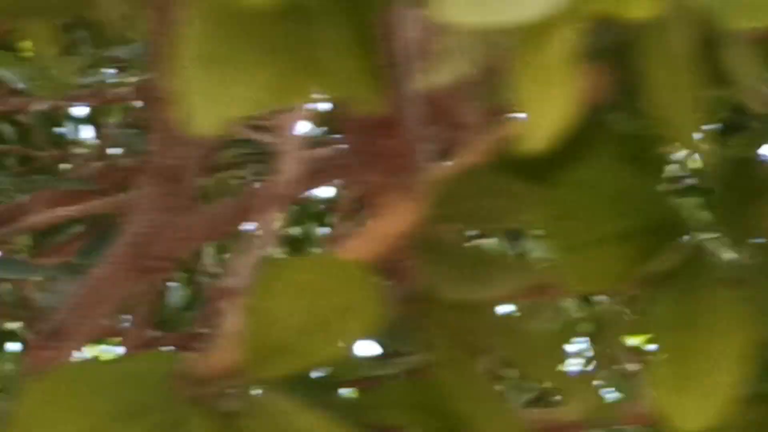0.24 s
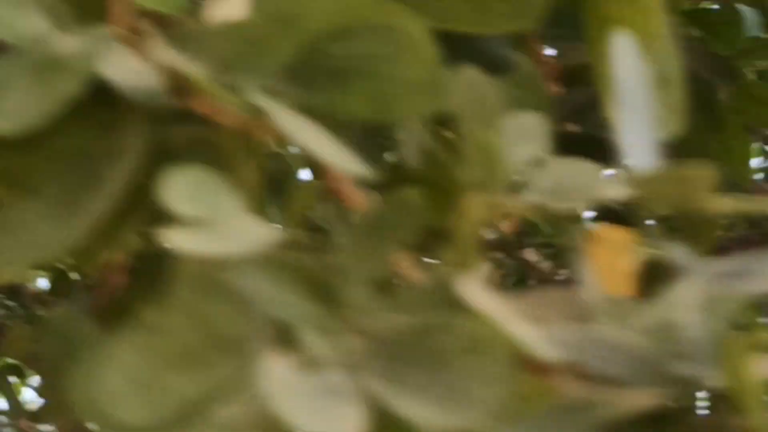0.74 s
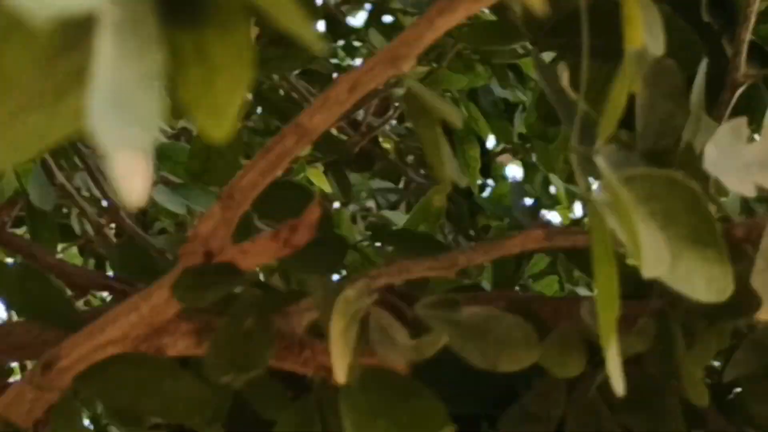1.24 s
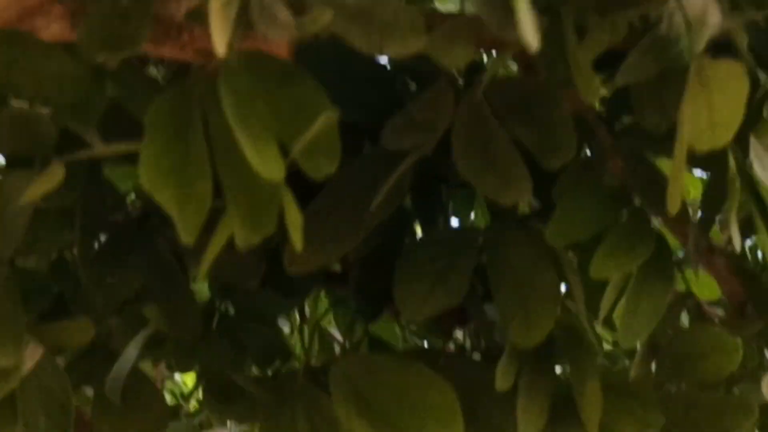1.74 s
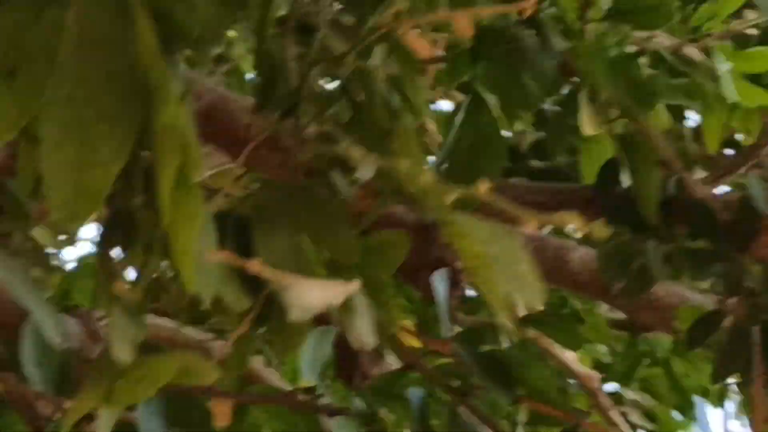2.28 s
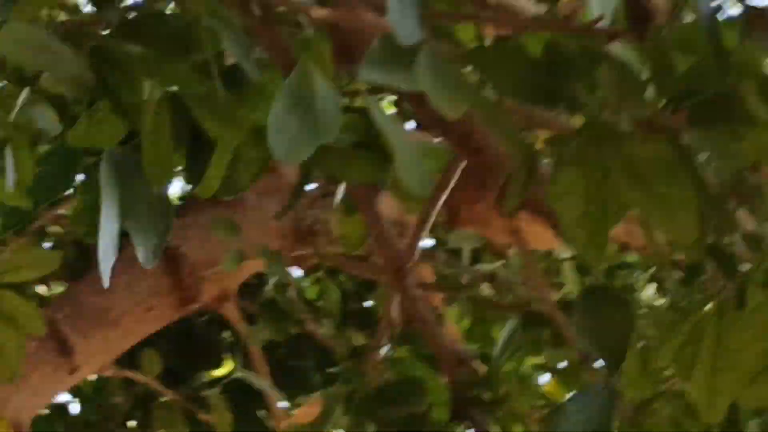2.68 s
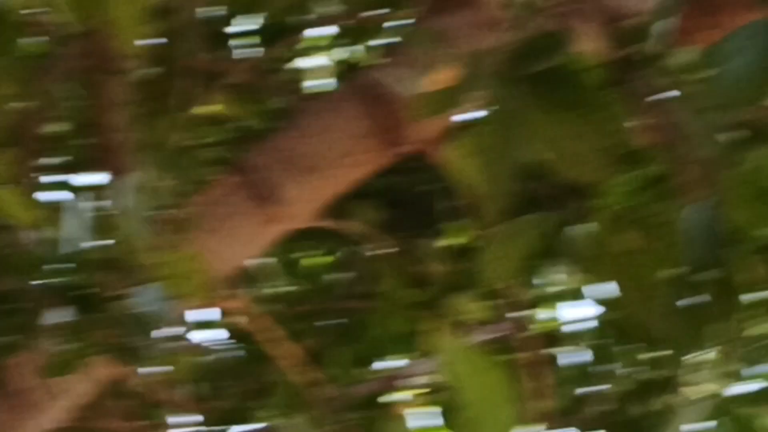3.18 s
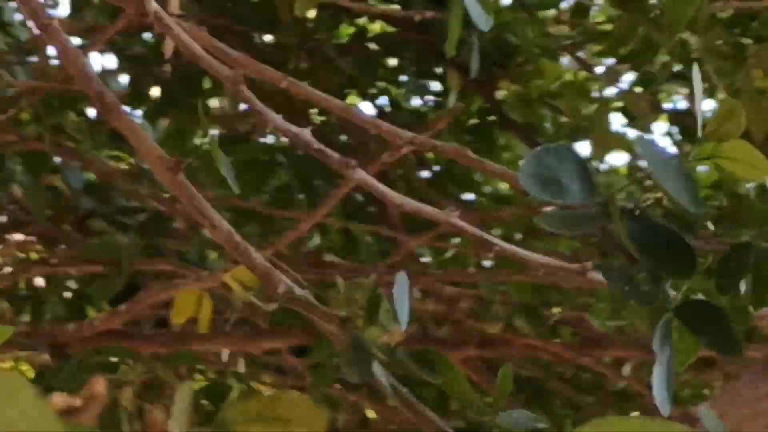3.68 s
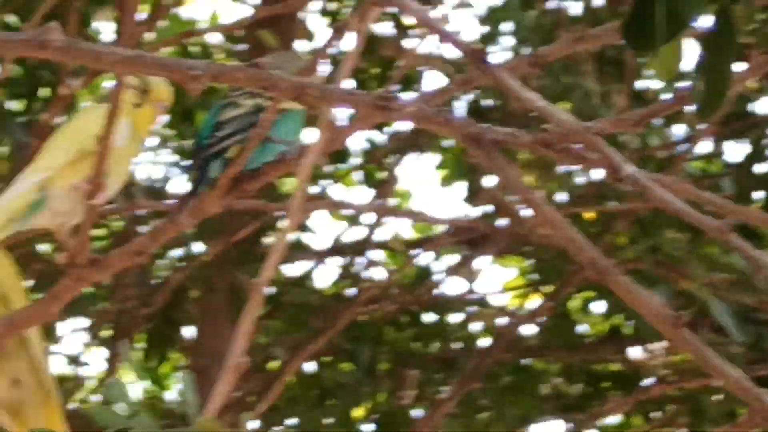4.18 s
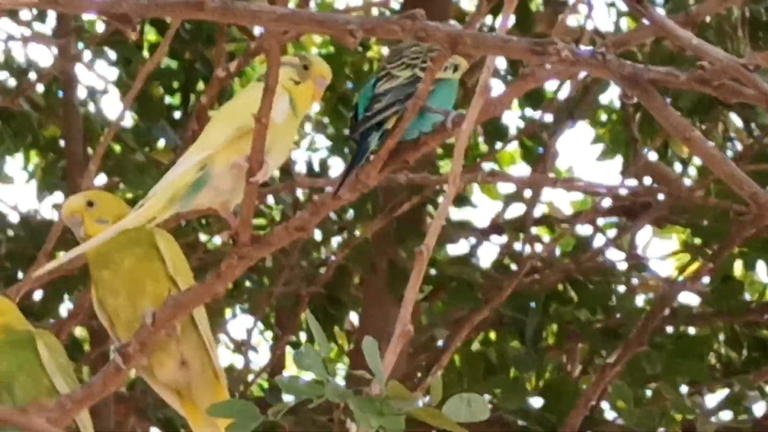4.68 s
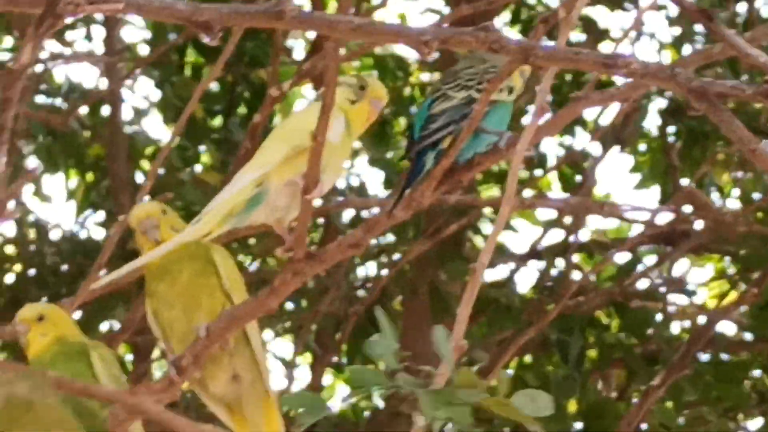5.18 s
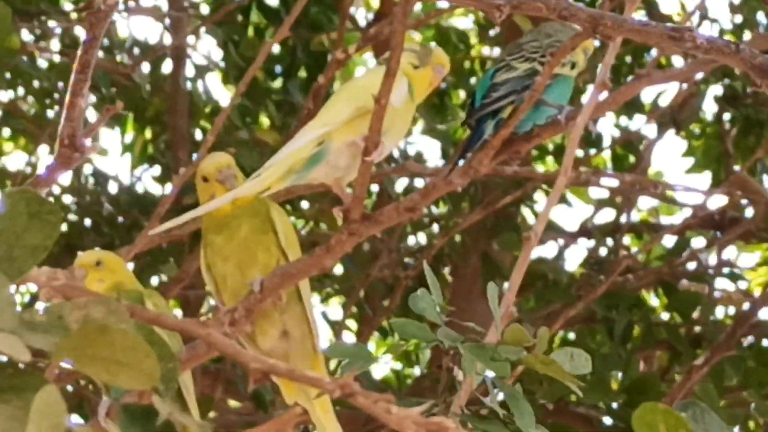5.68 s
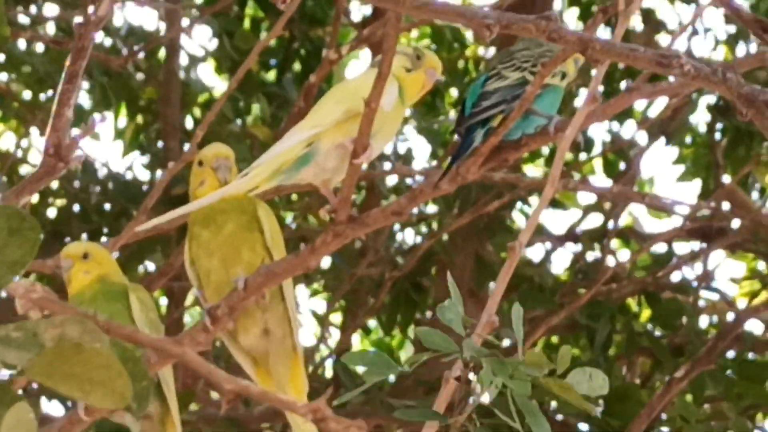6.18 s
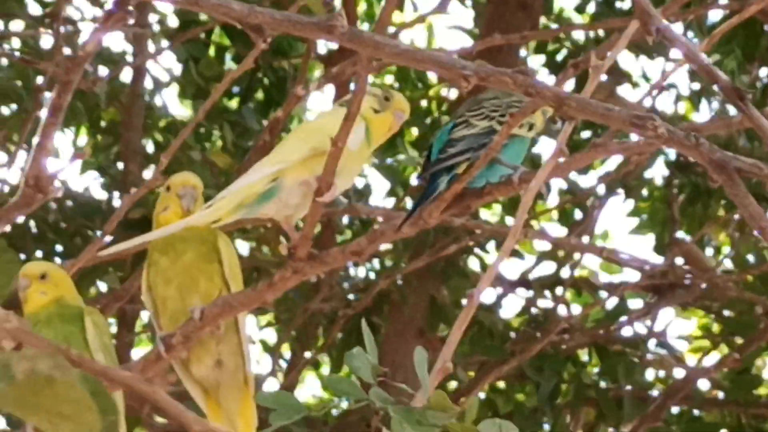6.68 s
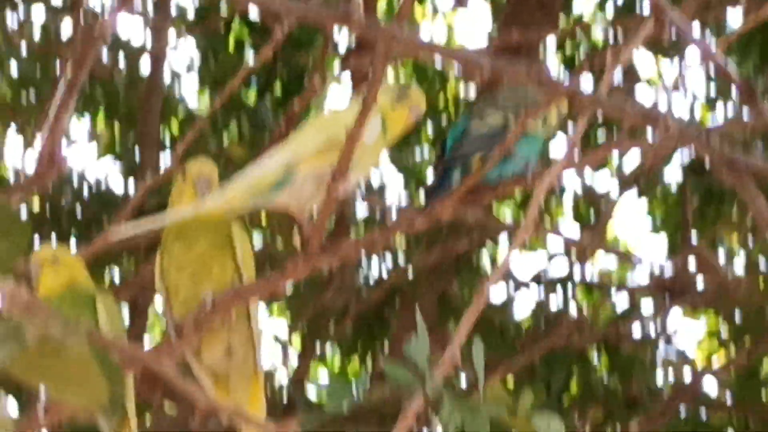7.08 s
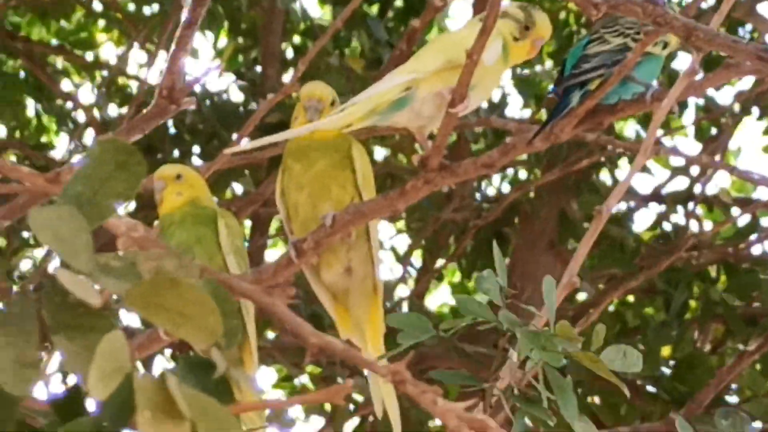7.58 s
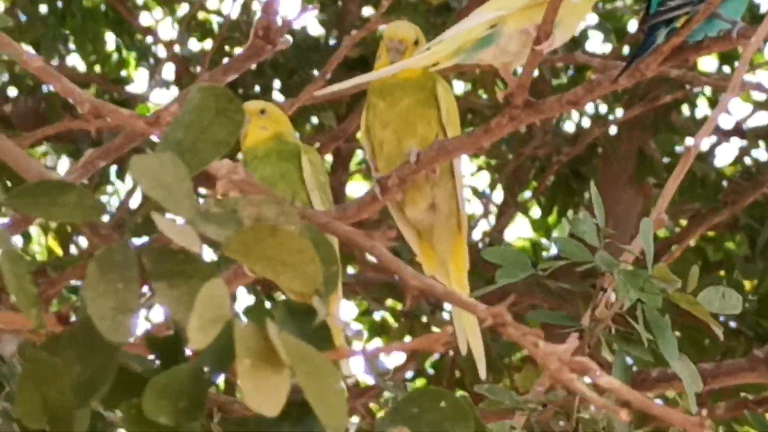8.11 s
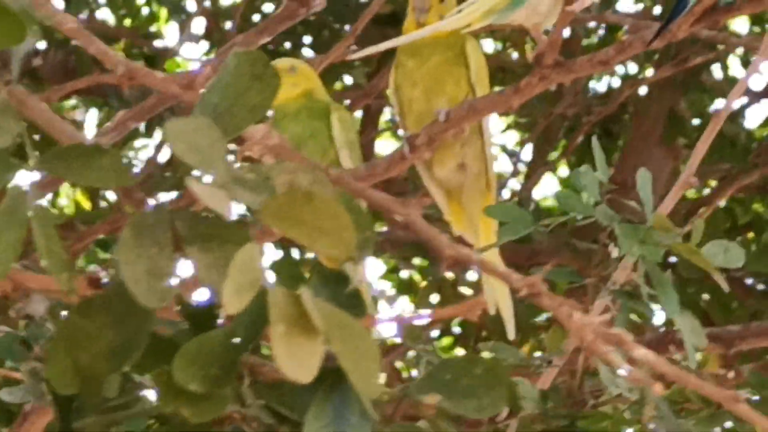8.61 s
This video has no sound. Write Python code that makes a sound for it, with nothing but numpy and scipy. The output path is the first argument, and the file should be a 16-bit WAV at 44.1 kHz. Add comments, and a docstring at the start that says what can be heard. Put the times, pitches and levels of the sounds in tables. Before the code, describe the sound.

Budgies give brief, bright, scratchy chirps among a babbling flock in a leafy aviary, with low hum, hand rumble and soft bumps.

```python
"""Small parrots chirrup close by from the start, over far twitter, a machine hum and the air of a leafy aviary.
The hand that carries the camera rumbles and bumps at once, and chiefly again near 7 s: noise and damped rings.
Soft chirps from other perches, bent sine slurs, and dry rasps of pulsed noise join in within 0.2 s.
A distant bird gives a pair of wavering hoots at 0.3 s and again at 4.5 s; another cries nasally at 1.2 s.
The near calls are overtone stacks that jump from note to note, with a little hiss."""
import sys
import numpy as np
from scipy import signal
from scipy.fft import rfft, irfft, next_fast_len
from scipy.io import wavfile
from scipy.ndimage import uniform_filter1d

SR = 44100
rng = np.random.default_rng(int(sys.argv[2]) if len(sys.argv) > 2 else 0)


def wrap_up_sound(samples):
    """Save the sound to the file named by the first command line argument, as 16-bit audio."""
    columns = np.atleast_2d(samples).T
    # keep every value between -1 and 1, then stretch to whole-number steps
    tamed = np.clip(columns, -1, 1)
    steps = np.round(tamed * 32767).astype(np.int16)
    wavfile.write(sys.argv[1], SR, steps)


N = 390285
TIME = np.arange(N) / SR

# Spectrum of the birds' turbulence. Each row: frequency in Hz, relative level in dB.
TURBULENCE_COLOUR = [(880, -81), (1500, -26), (2620, -17.5), (3090, -5), (4570, 1), (4990, -18.5),
                     (6430, -7), (8290, -13.5), (9140, -25), (11100, -73), (11700, -27), (13800, -22),
                     (15500, -44)]
# Liveliness of the flock. Each row: time in seconds, level in dB before each layer's offset.
FLOCK_LEVEL = [(0, -49.5), (1.2, -49), (2, -53.5), (3, -50), (3.6, -48), (4.5, -59), (4.92, -53.5),
               (5.3, -56.5), (6, -51.5), (6.5, -53), (7, -52.5), (7.5, -81), (8, -54), (8.85, -50)]


def amp(db):
    """Decibels to gain."""
    return 10 ** (np.asarray(db) / 20)


def unit(x):
    """Scales to rms 1."""
    return x / np.sqrt(np.mean(x ** 2) + 1e-20)


def read(points, hz):
    """Reads a spectrum on a log-frequency axis."""
    f, value = np.transpose(points)
    return np.interp(np.log(hz + 1), np.log(f + 1), value)


def curve(points):
    """Reads a curve of (seconds, value) over the whole scene."""
    return np.interp(TIME, *np.transpose(points))


def colour(x, points):
    """Filters by a spectrum in dB."""
    size = x.shape[-1]
    gain = amp(read(points, np.fft.rfftfreq(size, 1 / SR)))
    return irfft(rfft(x) * gain, size)


def wander(size, hz):
    """Random drift of rms about 1, low-passed softly near hz."""
    length = next_fast_len(size + 8192)
    f = np.fft.rfftfreq(length, 1 / SR)
    spectrum = rfft(rng.standard_normal(length)) * np.exp(-(f / hz) ** 2)
    return unit(irfft(spectrum, length))[:size]


def add(mix, s, sound):
    """Mixes a sound in at time s, cut to fit."""
    at = round(s * SR)
    sound = sound[..., max(-at, 0):]
    part = mix[..., max(at, 0):][..., :sound.shape[-1]]
    part += sound[..., :part.shape[-1]]


def echoes(x, t60, delay):
    """Scatter from leaves, mesh and walls: sparse taps that die away, others for each ear."""
    t = np.arange(SR) / SR
    signs = rng.choice([-1., 1.], (2, SR))
    present = rng.random((2, SR)) < 4000 / SR  # about 4000 taps a second
    taps = signs * present * (t > delay) * amp(-60 * t / t60)
    taps = taps / np.linalg.norm(taps, axis=1, keepdims=True)
    return signal.fftconvolve(np.atleast_2d(x), taps, axes=1)[:, :N]


def glide(length, pitches, edge, jitter, jitter_hz):
    """One gesture of the syrinx: progress 0-1, phase along a bent pitch path, and a gate with soft edges."""
    t = np.arange(-edge, max(length, edge) + edge, 1 / SR)
    u = np.clip(t / max(length, edge), 0, 1)
    path_hz = np.polyval(np.polyfit([0, .5, 1], pitches, 2), u)
    hz = path_hz * (1 + jitter * wander(len(t), jitter_hz))
    to_edge = np.minimum(t - t[0], t[-1] - t)
    gate = np.sin(np.pi / 2 * np.clip(to_edge / (2 * edge), 0, 1)) ** 2
    return u, 2 * np.pi * np.cumsum(hz) / SR, gate


def sing(call, accent_s, lead_stretch, accent_stretch, lead_ratio, accent_ratio,
         lead_db, accent_db, whistle_db, overtone_db):
    """The notes of one call at its own pace, pitch, strength and brightness; the whistles keep their pitch."""
    whistle_hz = 4800  # notes with a middle pitch above this count as whistles
    for start, end, *pitches, early_db, late_db, second_db, third_db in call:
        stretch, ratio, db = accent_stretch, accent_ratio, accent_db
        if start < 0:
            stretch, ratio, db = lead_stretch, lead_ratio, lead_db
        if pitches[1] > whistle_hz:
            ratio, db = 1, whistle_db
        yield (accent_s + stretch * start, accent_s + stretch * end, *np.multiply(pitches, ratio),
               early_db + db, late_db + db, second_db + overtone_db, third_db + overtone_db)


def song():
    """Every note of the near birds in order of time: loose peeps and three set calls."""
    # Each row: start and end in seconds, start, middle and end pitch in Hz, early and late level in dB,
    # 2nd and 3rd harmonic in dB re the 1st. In a call the loud accent is at 0 s, a quiet lead-in before it;
    # times, pitches and levels of a call are nominal, varied each time it is given.
    peeps = [(0.0, 0.015, 2534, 2607, 2490, -25.5, -33, -4, 9),
             (.012, 0.046, 3166, 3125, 3198, -20.5, -19.5, 3.5, -6),
             (.046, 0.075, 3990, 4090, 4085, -20.5, -24, -6.5, -10.5),
             (1.668, 1.698, 4080, 4155, 4420, -29.5, -32.5, -13.5, -46),
             (3.928, 3.936, 3820, 4220, 3960, -16, -38, -13, -19),
             (3.936, 3.952, 6090, 6520, 6300, -15.5, -15.5, -21.5, -42)]
    stair = [(-.126, -.114, 1710, 1651, 2270, -50, -42, 13, 2),
             (-.113, -.108, 3150, 3373, 4000, -30, -24, -6, -35),
             (-.106, -.079, 5330, 5200, 4300, -43.5, -43, -7, -34),
             (-.076, -.072, 3096, 2985, 2690, -32, -27.5, -23, -34),
             (-.071, -.028, 1941, 1947, 2270, -36.5, -35.5, 6, -12),
             (-.027, -.012, 3315, 3260, 3350, -20.5, -18, -8, -20),
             (-.011, -.003, 5800, 5700, 5650, -30, -29, -5.5, -38),
             (0, .01, 3846, 3733, 4250, -11.5, -10, -7.5, -18.5),
             (.012, .042, 5750, 5440, 5400, -20.5, -31.5, -7.5, -44)]
    tumble = [(-.109, -.097, 1690, 1643, 2083, -47.5, -45, 14, 8.5),
              (-.093, -.08, 5848, 6344, 6080, -27, -21.5, -11, -36),
              (-.084, -.079, 3575, 3568, 4090, -23, -23.5, -14, -14),
              (-.078, -.057, 2213, 2158, 2142, -35.5, -33, 12, -3.5),
              (-.059, -.036, 5627, 5640, 5610, -30.5, -25, -24, -39),
              (-.047, -.029, 2064, 1774, 2276, -52.5, -41.5, 19, -3.5),
              (-.029, -.015, 3260, 3740, 3650, -18, -24.5, -8.5, -22),
              (-.02, -.001, 2210, 2703, 2900, -36.5, -28.5, 2, 2.5),
              (0, .022, 4130, 4010, 3970, -11.5, -13, -12.5, -26.5),
              (.023, .038, 4037, 3630, 3860, -15, -23.5, -9, -41)]
    yelp = [(-.026, -.001, 1786, 1597, 2166, -53, -45, 15, 7),
            (0, .016, 4150, 4357, 4220, -17, -14.5, -14, -16.5),
            (.017, .031, 4200, 3940, 3960, -12.5, -18.5, -10.5, -23),
            (.032, .045, 6400, 6100, 5170, -36.5, -29.5, -22, -47)]
    # Each row, one giving of a call: accent in seconds, time stretch of lead-in and accent part,
    # pitch ratio of both, level offset in dB of lead-in, accent part, whistles and overtones.
    stair_times = [(1.509, .98, 1.2, 1.023, 1.025, 0.5, -2, -4.5, -3),
                   (5.419, 1.0, 0.77, 1.045, 1.06, 4.5, -0.5, 6.5, -2),
                   (7.383, 1.085, .72, .93, .965, 1, -2, -1, -2.5)]
    tumble_times = [(2.686, .96, 1.0, 1.004, 1.017, -1.7, 0.42, -10, -0.054),
                    (3.89, 0.97, 0.91, 1.068, 1, 0.23, 0.75, 6.5, 1),
                    (8.433, 1.0, 0.76, .98, .92, 3, -1, -5, -1)]
    yelp_times = [(2.765, .65, 1.0, 1.0, 1.0, 0, 0, 1.5, 0), (8.495, 1.5, 1.18, 0.93, .945, 3, 0, -11, -4)]
    notes = [tuple(note) for note in peeps]
    for call, rows in [(stair, stair_times), (tumble, tumble_times), (yelp, yelp_times)]:
        for row in rows:
            notes.extend(sing(call, *row))
    return sorted(notes)


def chirrups(edge=.001, rough=0.11, fourth_db=-6, hiss_db=-22.0):
    """The syrinx jumps from note to note; each is a clear tone with overtones and a little turbulence."""
    # Each row: start in seconds, left minus right in dB, time in seconds by which left leads.
    bearings = [(-.1, -2, 5.8e-5), (1.3, .6, -1.6e-5), (2.5, -.8, -1e-5), (3.7, -.8, -5.5e-5),
                (5.2, -2.8, 6.8e-5), (7.2, -.8, 6e-5), (8.3, -1.5, 5e-5)]
    out, effort, membrane = np.zeros((2, N)), np.zeros(N), np.zeros(N)
    ears = np.array([[.5], [-.5]])
    for start, end, *pitches, early_db, late_db, second_db, third_db in song():
        _, side_db, lead_s = [row for row in bearings if row[0] <= start][-1]
        lead_rad = 2 * np.pi * pitches[1] * lead_s
        u, phase, gate = glide(end - start, pitches, edge, jitter=0.013, jitter_hz=600)
        at = max(round((start - edge) * SR), 0)
        phase = phase + membrane[at]  # a joined note takes over the swing of the one before
        membrane[at:at + len(phase)] = phase
        level = gate * amp(np.interp(u, [.25, .75], [early_db, late_db]))
        partials_db = (0, second_db, third_db, third_db + fourth_db)
        tone = 0
        for k, db in enumerate(partials_db, 1):
            if k * max(pitches) < SR / 2:
                flutter = 1 + k * rough * wander(len(u), 980)  # overtones are rougher than the fundamental
                tone = tone + amp(db) * flutter * np.sin(k * (phase + ears * lead_rad))
        add(out, at / SR, np.sqrt(2) * level * tone * amp(ears * side_db))
        add(effort, at / SR, level ** 0.46)  # hiss varies less than the tone
    hiss = unit(colour(rng.standard_normal((2, N)), TURBULENCE_COLOUR))
    return out + amp(hiss_db) * effort * hiss


def chirp(length, pitches, overtone_db=-23):
    """A soft, slurred, slightly hoarse chirp: a sine and a weak octave."""
    u, phase, gate = glide(length, pitches, edge=.004, jitter=.024, jitter_hz=350)
    hoarse = unit(1 + .35 * wander(len(u), 450))
    tone = np.sin(phase) + amp(overtone_db) * np.sin(2 * phase)
    return np.sqrt(2) * gate * hoarse * tone


def warble(length_s, centre_hz, spread):
    """One brief random slur, more often falling than rising, from a random side."""
    pitch, slope, bend, size, length, side = np.clip(rng.standard_normal(6), -2, 2)
    fall = (.05 + .13 * slope) * np.array([1, 0, -1])
    arch = .07 * bend * np.array([0, 1, 0])
    pitches = centre_hz * np.exp(spread * pitch + fall + arch)
    gain = amp(2 * size + np.array([[2], [-2]]) * side)
    return chirp(length_s * np.exp(.4 * length), pitches) * gain


def flock(count=640, level_db=-2.5):
    """The rest of the flock babbles far off: randomly timed slurs, blurred by echoes."""
    babble = np.zeros((2, N))
    for _ in range(count):
        add(babble, rng.random() * N / SR, warble(length_s=.02, centre_hz=2715, spread=0.3))
    out = unit(babble) * amp(level_db + curve(FLOCK_LEVEL))
    return .62 * out + .78 * echoes(out, t60=.2, delay=.002)


def neighbours(count=190, level_db=-4.0):
    """Birds in the next branches warble in a loose stream of slurs, louder when the flock is lively."""
    out = np.zeros((2, N))
    slot_s = N / SR / count
    for slot in range(count):
        start = (slot + rng.random()) * slot_s
        add(out, start, warble(length_s=.022, centre_hz=2800, spread=.2))
    return out * amp(level_db + curve(FLOCK_LEVEL))


def hum(waver_db=1.5):
    """Machine hum of two wavering tones that swells as the microphone moves through it."""
    # Each row: frequency in Hz, level in dB before swell and waver.
    hum_tones = [(99.6, -46.5), (199.4, -55.5)]
    # Each row: time in seconds, level offset in dB.
    hum_swell = [(0, 2.5), (1.8, 1), (2.3, -3), (2.9, -2.5), (4.4, -2), (5.4, 2.5), (6.2, -1.5), (6.8, 3.5),
                 (7.5, 5), (8.85, 3)]
    swell_db = curve(hum_swell)
    ears = np.zeros((2, N))
    for ear in ears:
        for hz, db in hum_tones:
            level = amp(db + swell_db + waver_db * wander(N, 8.7))
            phase = 2 * np.pi * hz * TIME + 0.31 * wander(N, 5.4)
            ear += level * np.sin(phase)
    return np.sqrt(2) * ears


def air(level_db=-45, swell_db=-1.0, patch_db=3.5):
    """Outdoor noise, partly alike in both ears; its middle range comes and goes in patches."""
    # Each row: frequency in Hz, relative density in dB per Hz.
    air_colour = [(15, -45), (25, -16.5), (101, 1), (204, -11), (368, -20), (648, -19), (1020, -25.5),
                  (2490, -26.5), (5880, -28.5), (7300, -25.5), (8580, -30.5), (9300, -53), (10900, -71),
                  (11800, -37.5), (15500, -36.5)]
    # Each row: frequency in Hz, left-right likeness from 0 to 1.
    likeness = [(60, 0.33), (180, 0.6), (550, 0.098), (1650, 0)]
    left, other = rfft(rng.standard_normal((2, N)))
    same = np.clip(read(likeness, np.fft.rfftfreq(N, 1 / SR)), 0, 1)
    right = same * left + np.sqrt(1 - same ** 2) * other
    pair = irfft(np.array([left, right]), N)
    hz, _, z = signal.stft(colour(pair, air_colour), SR, nperseg=1024)
    patches = uniform_filter1d(rng.standard_normal(z.shape[1:]), size=7, axis=1)
    patches = unit(uniform_filter1d(patches, size=4, axis=0))
    depth = read([(150, 0), (500, .6), (1500, 1), (4000, 1), (8000, .3)], hz)[:, None]
    pair = signal.istft(z * amp(patch_db * depth * patches), SR)[1][:, :N]
    return unit(pair) * amp(level_db + swell_db * wander(N, 8.7))


def handling(rumble_db=-3, lump_db=3, bump_db=0, ear_offset_db=2.0):
    """Fingers shift on the camera: lumpy rumble in each port, and heavily damped knocks, stronger at right."""
    # One curve a spell. Each row: time in seconds, level in dB before rumble_db and lumps.
    rumble_spells = [
        [(0.0, -23), (.07, -22), (.24, -46), (.34, -28), (.52, -27.5), (.9, -41), (1.46, -28.5), (1.55, -40.5),
         (2.0, -39.5)],
        [(6.7, -39), (7.05, -33.5), (7.24, -49), (7.33, -28), (7.46, -42.5), (7.7, -27.5), (7.98, -41),
         (8.14, -31), (8.5, -41)],
    ]
    # Each row: frequency in Hz, relative level in dB.
    rumble_colour = [(20, -64), (35, -35), (55, -7.5), (80, 1), (105, 0), (150, -2), (250, -15.5),
                     (450, -36.5), (700, -75), (1200, -100)]
    # Each row: start in seconds, peak in dB before the ear offset, nominal ring in Hz.
    bumps = [(0.058, -14.5, 93), (0.206, -25.5, 183), (.5, -20, 115), (0.813, -15.5, 136),
             (1.368, -20.5, 121), (1.433, -24, 210), (1.464, -20, 111), (1.781, -28, 148), (3.21, -31, 128),
             (4.127, -32.5, 178), (6.836, -18.5, 94), (7.326, -20.5, 135), (7.693, -26, 108),
             (8.119, -20, 131)]
    out = np.zeros((2, N))
    for rows in rumble_spells:
        level = amp(np.interp(TIME, *np.transpose(rows), left=-100, right=-100))
        pressure = uniform_filter1d(level, size=900)
        noise = colour(rng.standard_normal((2, N)), rumble_colour)
        lumps = amp(lump_db * wander(N, 34))
        out += pressure * amp(rumble_db) * unit(noise * lumps)
    t = np.arange(SR // 10) / SR
    for s, db, hz in bumps:
        turns = hz * t * rng.uniform(.85, 1.25, (2, 1))  # each port rings at its own pitch
        knock = turns * np.exp(-turns / .32) * np.sin(2 * np.pi * turns)
        add(out, s, amp(db + bump_db) * knock / abs(knock).max())
    return out * amp([[-ear_offset_db], [ear_offset_db]])


def perches(level_db=-1.0):
    """Single arched slurs from birds a few metres off."""
    # Each row: start in seconds, length in seconds, middle pitch in Hz, slide in octaves,
    # level in dB before level_db.
    chirp_rows = [(0.11, .018, 2270, -0.09, -43), (0.129, .012, 2830, -.05, -40),
                  (.211, 0.025, 3230, 0, -40.5), (0.486, .047, 3064, -.45, -45.5),
                  (0.925, 0.039, 3280, -.05, -45), (0.976, 0.045, 2720, -0.42, -45),
                  (1.112, 0.032, 3150, 0.28, -38.5), (1.147, 0.026, 3510, -0.26, -37),
                  (1.189, 0.032, 3330, -0.055, -36), (1.232, 0.034, 3160, -0.1, -34.5),
                  (1.28, .024, 2940, -0.43, -42), (2.164, 0.049, 2630, -0.3, -44.5),
                  (2.492, 0.019, 2680, -.2, -42.5), (3.137, .025, 3660, 0.11, -39.5),
                  (3.172, 0.05, 5110, .3, -38), (3.302, 0.02, 2980, -.5, -45),
                  (3.597, 0.032, 2870, -.25, -47.5), (3.677, .012, 5600, -0.056, -44),
                  (4.076, .019, 3150, -.05, -41), (4.309, 0.0251, 3400, -.5, -46.5),
                  (4.621, 0.027, 1760, .3, -48), (4.921, .019, 3250, -.07, -49),
                  (5.237, .02, 5400, -.4, -42), (5.686, 0.02, 4000, 0, -43),
                  (5.98, 0.052, 3240, -.2, -49.5), (6.387, 0.051, 4110, -0.066, -39),
                  (6.445, 0.04, 4420, -0.073, -42.5), (6.53, 0.043, 3100, -0.28, -47.5),
                  (6.568, .065, 2755, 0.0071, -45), (6.965, .032, 3920, -0.16, -42),
                  (7.948, .043, 2674, -.1, -47), (8.196, 0.03, 4870, -0.68, -44),
                  (8.282, 0.031, 3660, -0.15, -45.5)]
    arch_octaves = 0.0985  # both ends lie this far under the straight slide
    out = np.zeros((2, N))
    for start, length, hz, slide, db in chirp_rows:
        octaves = slide * np.array([-.5, 0, .5]) - arch_octaves * np.array([1, 0, 1])
        pitches = hz * 2 ** octaves
        side_db = rng.normal(0, 2.5)
        sides = amp([[side_db], [-side_db]])
        add(out, start - .004, amp(db + level_db) * chirp(length, pitches) * sides)
    return out


def rasps(pulse_hz=178):
    """Harsh scolding bursts: turbulence that pulses quickly and swells toward the end."""
    # Each row: start in seconds, length in seconds, level in dB.
    rasp_rows = [(.18, 0.088, -44), (0.583, 0.047, -49), (1.616, 0.05, -42.5), (1.87, 0.06, -37),
                 (2.261, 0.045, -44), (3.15, 0.033, -44.5), (3.482, 0.027, -44.5), (4.114, 0.042, -29.5),
                 (5.14, 0.048, -32), (6.391, 0.025, -41.5), (6.775, 0.04, -48)]
    effort = np.zeros(N)
    for start, length, db in rasp_rows:
        t = np.arange(0, length, 1 / SR)
        cycle = np.cumsum(pulse_hz * (1 + 0.1 * wander(len(t), 80))) / SR % 1
        pulses = 1.3 + np.sin(np.pi * cycle) ** 4
        swell = .3 + t / length
        add(effort, start, amp(db) * unit(pulses * swell * signal.windows.tukey(len(t), .3)))
    turbulence = rng.standard_normal(N) + .5 * rng.standard_normal((2, N))  # shared part plus each ear's own
    return effort * unit(colour(turbulence, TURBULENCE_COLOUR))


def far_call(rows, harmonics):
    """A long, slightly quavering call along a pitch curve: its start and its sound."""
    s, hz, db = np.transpose(rows)
    t = np.arange(s[0], s[-1], 1 / SR)
    quaver = 1 + .011 * wander(len(t), 50)
    phase = 2 * np.pi * np.cumsum(np.interp(t, s, hz) * quaver) / SR
    tone = sum(amp(level) * np.sin(round(k) * phase) for k, level in harmonics)
    return s[0], unit(tone) * amp(np.interp(t, s, db)) * signal.windows.tukey(len(t), .08)


def distant_birds(level_db=-1.5):
    """Pure wavering hoots and one nasal cry without its fundamental, blurred by distance."""
    # Each row, one pair of hoots: start in seconds, level offset in dB.
    hoot_pairs = [(.27, 1), (4.535, 0)]
    # Each row: time in seconds from the start of the pair, pitch in Hz, level in dB before offsets.
    long_hoot = [(0, 715, -45), (.065, 780, -51), (.14, 700, -48), (.25, 721, -51.5), (.38, 720, -51.5),
                 (.46, 686, -49), (.52, 740, -47), (.6, 682, -51), (.72, 745, -53)]
    soft_hoot = [(.89, 688, -47), (.95, 674, -55.5), (1.05, 670, -58), (1.2, 692, -55), (1.35, 692, -57),
                 (1.46, 700, -69)]
    # Each row: time in seconds, pitch in Hz, level in dB before level_db.
    cry_curve = [(1.19, 505, -68), (1.25, 521, -48.5), (1.35, 543, -50), (1.45, 570, -47), (1.58, 566, -52),
                 (1.64, 564, -72)]
    # Each row: multiple of the pitch, relative level in dB.
    cry_harmonics = [(2, -15), (3, -0.5), (4, 6), (5, -17)]
    out = np.zeros(N)
    for start, db in hoot_pairs:
        for hoot in (long_hoot, soft_hoot):
            after, sound = far_call(hoot, [(1, 0)])
            add(out, start + after, amp(db) * sound)
    add(out, *far_call(cry_curve, cry_harmonics))
    heard = out + .4 * echoes(out, t60=.5, delay=.015)
    return amp(level_db) * heard


def scene(leaves_db=-12, room_db=-25.5, far_wet_db=-8):
    """Near birds with quick scatter and a faint tail; the other birds, hum and air behind, plus handling."""
    near = chirrups() + rasps()
    far = perches() + neighbours()
    leaves = amp(leaves_db) * echoes(near, t60=0.1, delay=0.0076)
    room = amp(room_db) * echoes(near, t60=0.86, delay=0.0086)
    near = near + leaves + room
    far = far + amp(far_wet_db) * echoes(far, t60=0.22, delay=0.0046)
    return near + far + flock() + distant_birds() + hum() + air() + handling()


def record(dry):
    """The microphone ports' bass roll-off, notch and unequal treble, then the band limit."""
    # Each row: frequency in Hz, gain in dB.
    port_response = [(15, -30), (35, -12.5), (60, -2.5), (90, -1), (8300, 2.5), (9100, -9.5), (9900, -19),
                     (10700, -18), (11700, 3.5), (22050, -1)]
    # Each row: frequency in Hz, left minus right in dB.
    port_balance = [(4200, 1), (6000, 0.5), (7800, 3), (12000, -1)]
    edge_hz = 15700
    ports = []
    for x, side in zip(dry, (.5, -.5)):
        balance = [(hz, side * db) for hz, db in port_balance]
        ports.append(colour(colour(x, port_response), balance))
    band = signal.firwin(511, edge_hz, window=("kaiser", 9), fs=SR)
    return signal.oaconvolve(np.array(ports), band[None], "same")


dry = scene()
out = record(dry)
wrap_up_sound(out)
```